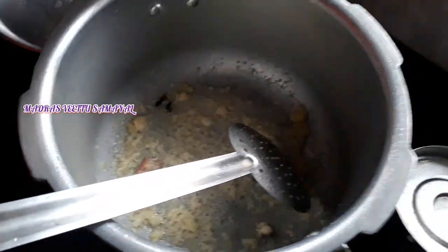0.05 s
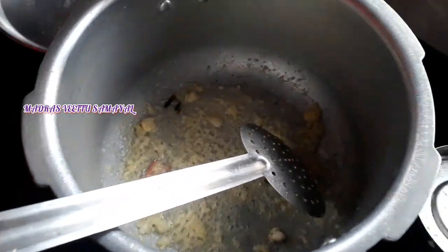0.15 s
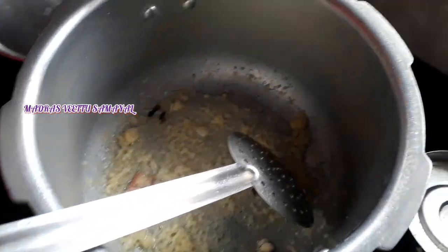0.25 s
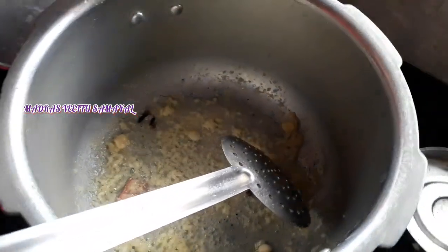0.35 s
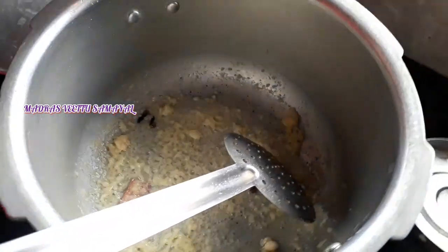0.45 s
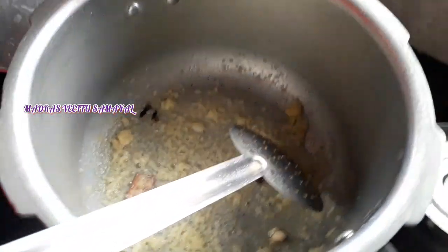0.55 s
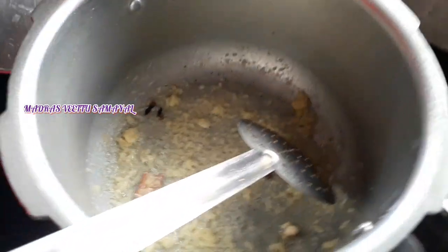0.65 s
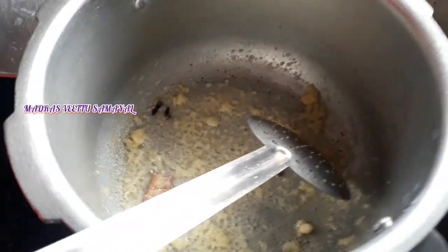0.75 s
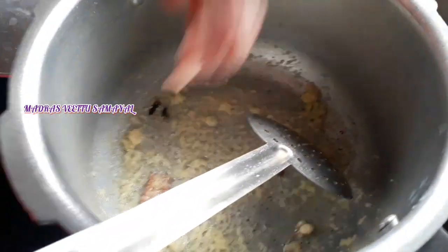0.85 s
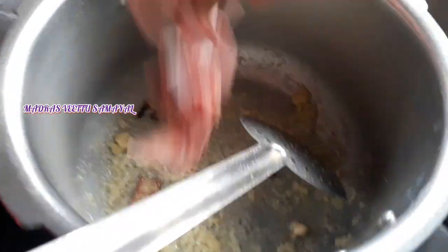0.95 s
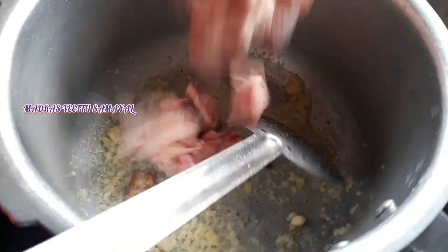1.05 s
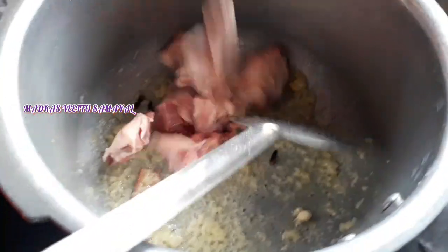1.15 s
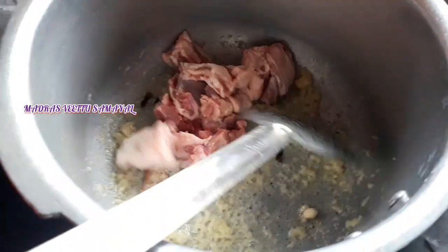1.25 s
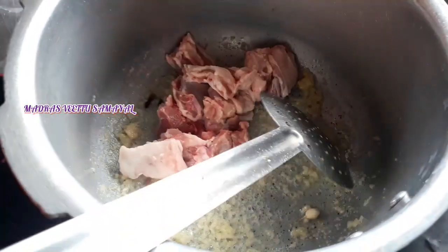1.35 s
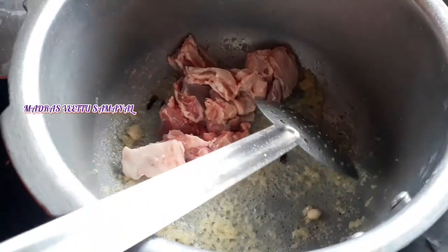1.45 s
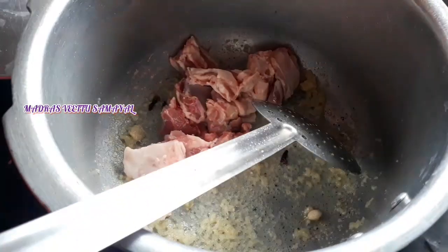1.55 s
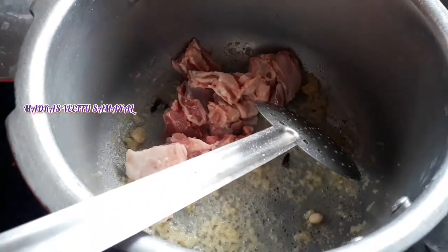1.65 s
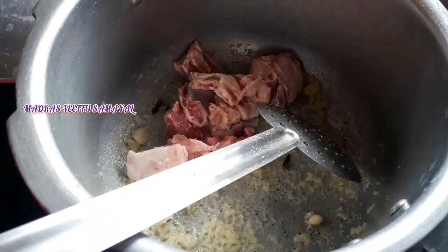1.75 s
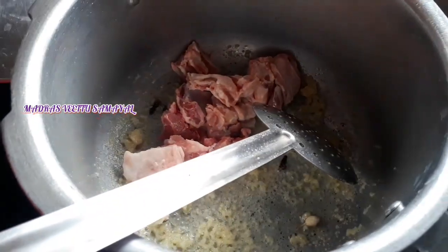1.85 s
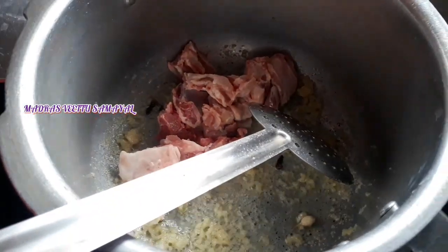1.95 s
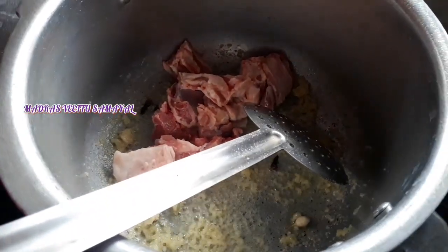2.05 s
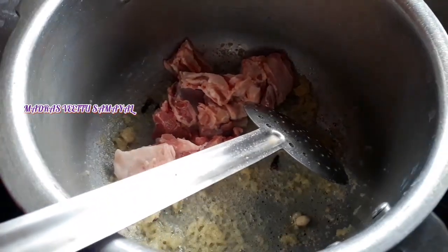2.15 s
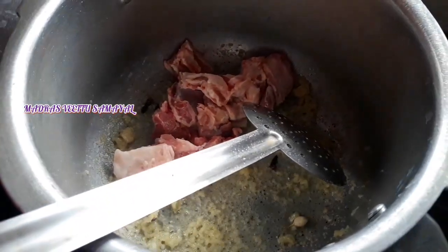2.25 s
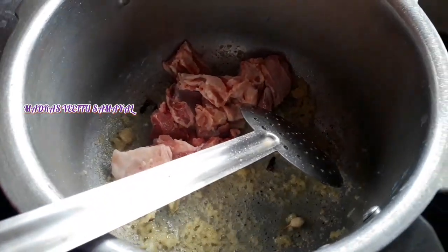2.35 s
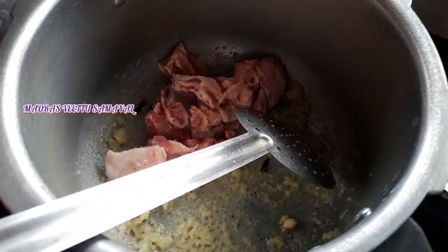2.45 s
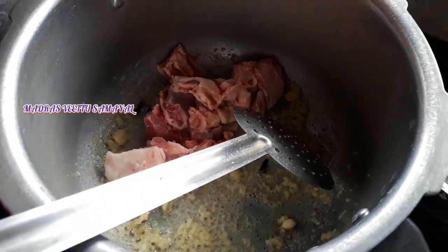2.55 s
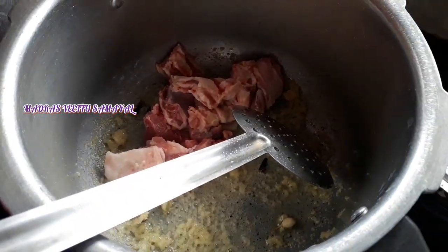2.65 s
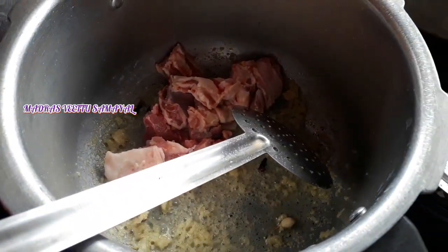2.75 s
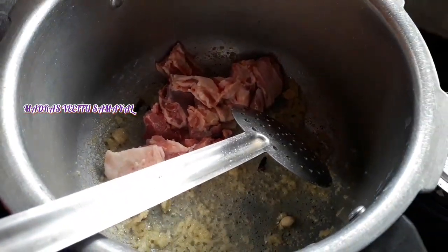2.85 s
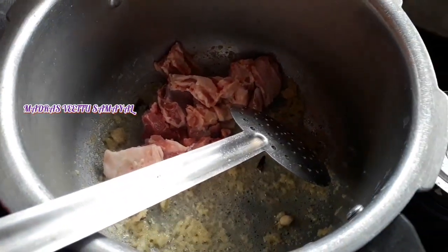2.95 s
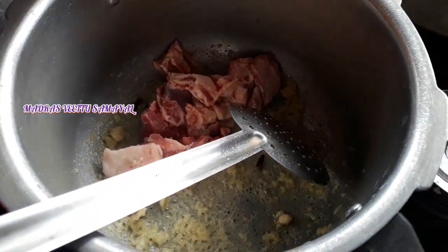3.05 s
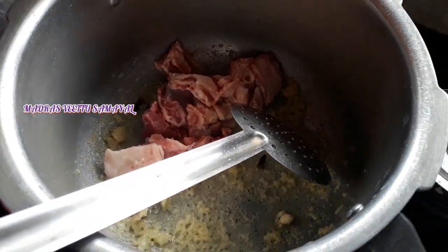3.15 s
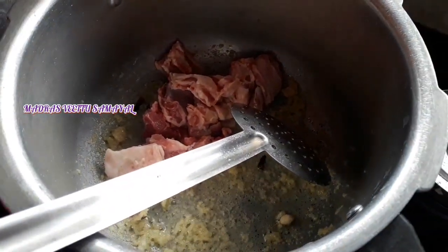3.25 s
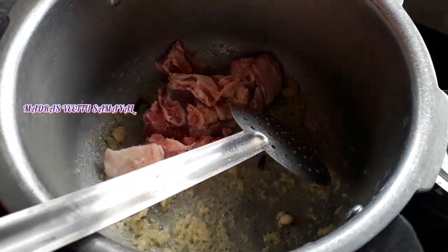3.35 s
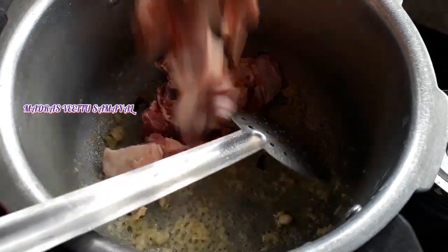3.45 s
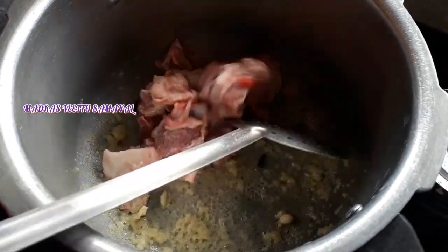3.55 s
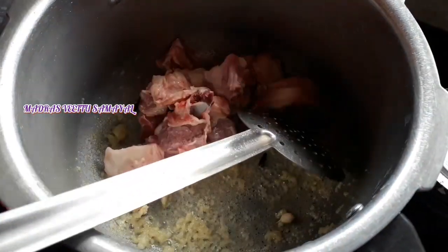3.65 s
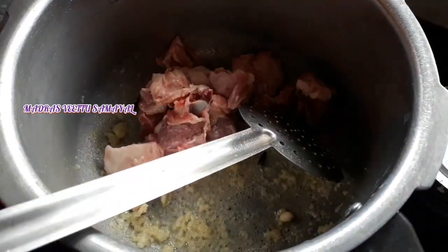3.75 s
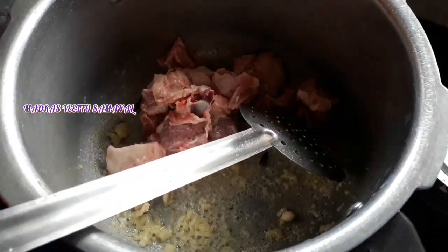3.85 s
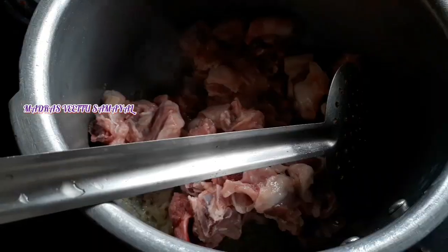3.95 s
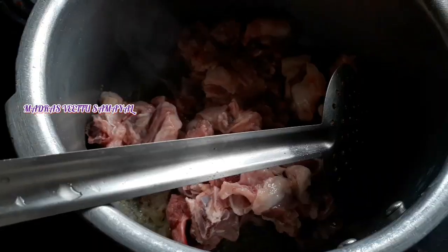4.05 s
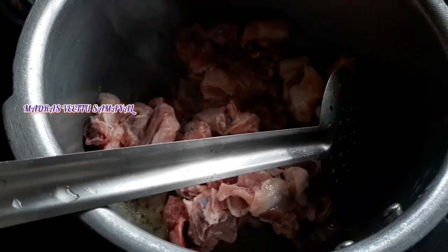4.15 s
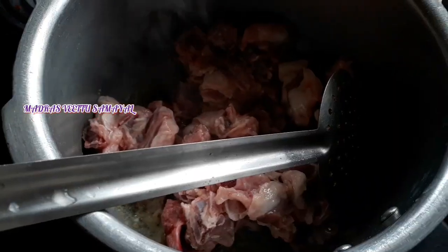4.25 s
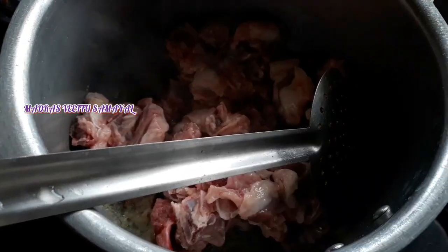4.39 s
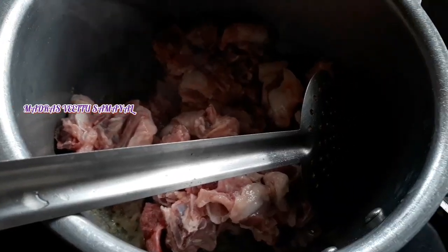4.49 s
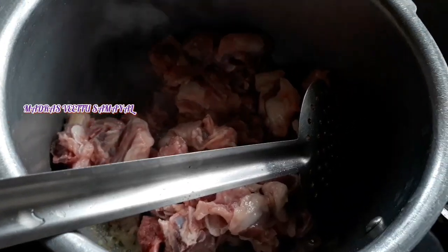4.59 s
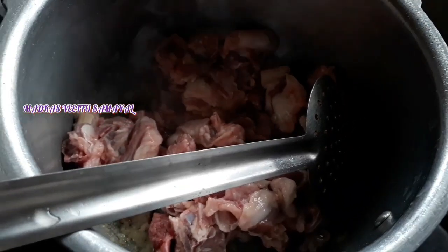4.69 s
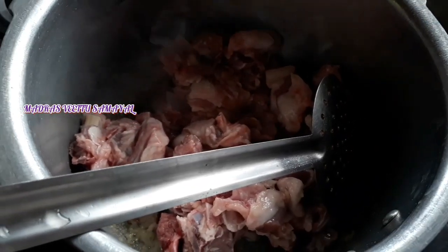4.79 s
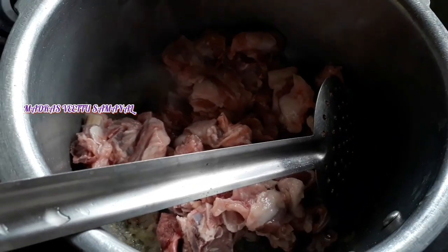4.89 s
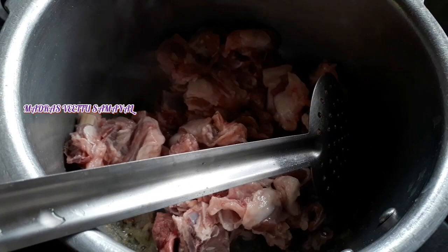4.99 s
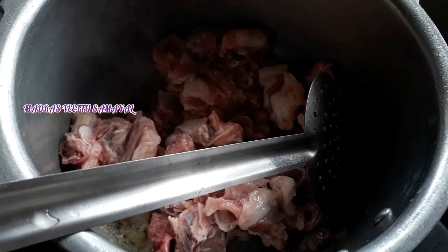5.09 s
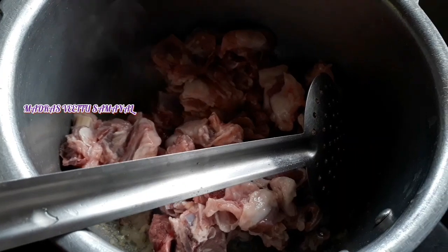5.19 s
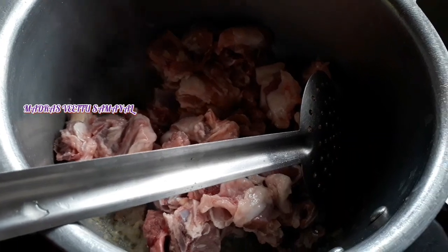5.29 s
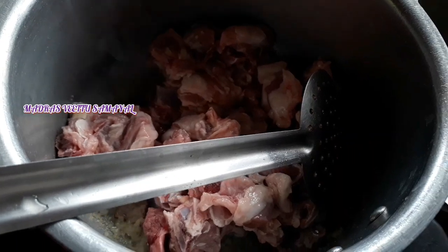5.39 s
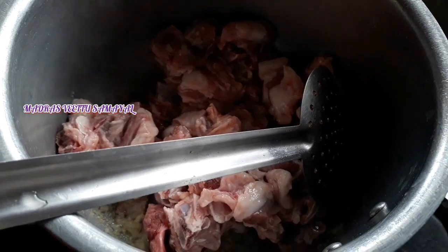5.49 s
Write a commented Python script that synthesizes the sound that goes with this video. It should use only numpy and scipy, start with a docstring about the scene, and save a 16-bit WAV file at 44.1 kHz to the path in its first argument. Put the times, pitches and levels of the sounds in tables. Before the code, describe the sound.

A close stereo phone pickup of frying in an open metal pot. It starts quietly with thin oil fizz, then wet meat drops in, the sizzle leaps up and swells, and a ladle cracks on the rim. Another heavier slap follows, with hissing spits and tiny squeaks. The sizzle becomes lower and wetter, a hollow pot thud sounds, and soft handling bumps come near the end.

```python
"""A small kitchen: two handfuls of raw meat drop into hot oil in an open pressure cooker, close to a phone.
Frying is a crowd of random bubble pops, filtered by the air in the pot; it deepens as the meat covers the bottom.
Slaps, spits and steam squeaks are fading bands of noise; ladle and pot add decaying tones to their noise.
Fingers nudge the phone with single swings of pressure, and the burner rushes softly as low filtered noise."""
import sys
import numpy as np
from scipy import signal
from scipy.fft import rfft, irfft, next_fast_len
from scipy.io import wavfile
from scipy.ndimage import uniform_filter1d

SR = 44100
rng = np.random.default_rng(int(sys.argv[2]) if len(sys.argv) > 2 else 0)


def inscribe(sig):
    """Save sig as 16-bit PCM at rate SR to the path in sys.argv[1].

    A 1-D sig is mono; a 2-D sig holds one channel per row.
    Samples are clipped to [-1, 1] before scaling.
    """
    pcm = np.round(np.clip(np.atleast_2d(sig).T, -1, 1) * 32767)
    wavfile.write(sys.argv[1], SR, pcm.astype(np.int16))


N = 243599
TIME = np.arange(N) / SR  # seconds
SIZE = next_fast_len(N + SR)  # padded length for filtering
FREQ = np.maximum(np.arange(SIZE // 2 + 1) * SR / SIZE, 1)  # Hz

# meat meets the hot metal and starts to boil:
# start_s [s], level_db [dB, before swelling], cooling_db_per_s [dB/s]
LANDINGS = [(0.979, -24.3, 3.5), (1.11, -21, 3), (3.52, -22.5, 1.7)]


def meat():
    """Juice boils off in surges; the heap muffles the spray and the larger bubbles ring the air in the pot."""
    # sound of the frying on open metal: pitch_hz [Hz], level_db [relative dB per Hz]
    open_colour = [(180, -27), (300, -23), (342, -24), (545, -12), (940, -22.5), (1170, -16.5),
                   (1620, -18.5), (1850, -7.5), (2580, -4.5), (3000, -0.5), (5180, 0.5), (6970, -1),
                   (8230, -14), (11700, -1), (15700, -9.5)]
    # sound of the frying under the heap: pitch_hz [Hz], level_db [relative dB per Hz]
    covered_colour = [(180, -66), (300, -18.5), (360, -16), (653, -5.5), (895, -14.5), (1130, -4),
                      (1270, -10.5), (1950, 2), (3100, -1), (3720, 3), (4610, -2), (6860, -3), (8650, -14),
                      (13100, -9.5), (15700, -18)]
    # resonances of the air in the open pot: pitch_hz [Hz], width_hz [Hz], lift_db [dB, negative for a dip]
    pot_air = [(553, 74, 3), (631, 33, 2.5), (1151, 14, 6.5), (1344, 140, 3.5), (1540, 70, 1),
               (1590, 96, 2), (1906, 65, 3), (2094, 180, -2), (2325, 110, 2.5), (2970, 240, 2.5),
               (3500, 170, 1), (4120, 92, 1.5), (4950, 140, 4), (5340, 140, 5)]
    # the second handful settles, then slumps over the hot metal: time_s [s], covered_share [0-1]
    cover_steps = [(3.5, 0.2), (3.6, 0.26), (3.86, 0.43), (3.93, 0.96)]
    cover = np.clip(np.interp(TIME, *np.transpose(cover_steps)), 0, 1)

    # the sizzle starts almost at once; the fine spray builds more slowly
    sizzle_db = boil(rise_s=0.0056)
    spray_db = boil(rise_s=0.098) - 2.5
    # wet bubbling partly follows the sizzle, and grows as juice gathers under the heap
    covered_s = np.cumsum(cover) / SR
    bubbling_db = -31 + 0.22 * (sizzle_db - sizzle_db.max()) + 1.34 * covered_s

    air_db = sum(db / (1 + (2 * (FREQ - hz) / width) ** 2) for hz, width, db in pot_air)
    bursts = echo(pops(per_s=20000, spread_db=2.4), t60=0.12, wet_db=-13)
    fry = colour(bursts * (1 - cover), even(shape(open_colour) + air_db))
    fry += colour(bursts * cover, even(shape(covered_colour) + air_db))

    # large bubbles sound low, the finest spray high; each band surges on its own
    low_pass = signal.butter(3, 2300, fs=SR, output="sos")
    high_pass = signal.butter(3, 8500, "high", fs=SR, output="sos")
    low = signal.sosfiltfilt(low_pass, fry)
    high = signal.sosfiltfilt(high_pass, fry)
    middle = fry - low - high
    # cover strengthens the bubbling and weakens the rest, in dB at full cover
    bubbling = steady(low) * amp(bubbling_db + 5 * cover + surge())
    sizzle = steady(middle) * amp(sizzle_db - 4.5 * cover + surge())
    spray = steady(high) * amp(spray_db - 3 * cover + surge())

    # the frying dips briefly before the second handful
    lull_s, lull_width_s, lull_db = 3.39, 0.061, -1.6
    dip_db = lull_db * np.exp(-((TIME - lull_s) / lull_width_s) ** 2)
    heave_db = 0.35 * walk(7)  # the whole boil heaves slowly
    first_landing_s = LANDINGS[0][0]
    return (bubbling + sizzle + spray) * amp(dip_db + heave_db) * (TIME > first_landing_s)


def boil(rise_s):
    """Strength of the frying in dB: every portion catches, swells and cools, and their powers add."""
    # each portion boils harder as its juice runs out, while the metal cools
    swell_db, swell_s = 10, 0.99
    power = 1e-12  # avoids the logarithm of zero
    for start_s, level_db, cooling_db_per_s in LANDINGS:
        age = np.maximum(TIME - start_s, 0)
        heat_db = swell_db * (1 - np.exp(-age / swell_s)) - cooling_db_per_s * age
        catching = 1 - np.exp(-age / rise_s)
        power = power + amp(level_db + heat_db) ** 2 * catching
    return 10 * np.log10(power)


def surge():
    """Quick, uneven swelling of the boil, in dB."""
    return 0.5 * walk(35)


def oil():
    """Spices fry in the oil: many tiny bubble pops make a thin, fine fizz."""
    # sound of the fizz: pitch_hz [Hz], level_db [relative dB per Hz]
    oil_colour = [(290, -35), (500, -7.5), (840, -19), (1090, -10), (1430, -3), (1750, -4), (1910, -2),
                  (2340, -3.5), (5250, 2.5), (7970, -1.5), (8690, -9), (10600, 0.5), (15700, -1.5)]
    fizz = pops(per_s=16000, spread_db=2.0)
    level_db = -30.5 + 0.18 * walk(25.7)
    return colour(fizz, even(shape(oil_colour))) * amp(level_db)


def slaps():
    """Soft wet pieces hit the bottom and each other, and the hollow of the pot answers in a lower band."""
    # meat landing or shifting: start_s [s], level_db [dB], pitch_hz [Hz, centre]
    slap_times = [(0.97, -30, 650), (0.9858, -19.5, 750), (1.045, -29, 700), (1.15, -26, 1300),
                  (3.532, -11.5, 1200), (3.553, -19.5, 1500), (3.573, -22, 650), (3.694, -26, 800),
                  (4.635, -14.5, 1800), (4.657, -17, 2000), (5.336, -16.5, 1700)]
    out = 0
    for start_s, level_db, pitch_hz in slap_times:
        out = out + flurry(start_s, level_db, t60=0.1, hz=pitch_hz, octaves=0.99)
        out = out + flurry(start_s, level_db - 7.5, t60=0.16, hz=560, octaves=0.19)  # the hollow
    return out


def spits():
    """Drops of water flash to steam in the oil: short bursts of high noise."""
    # bursting drops: start_s [s], level_db [dB], pitch_hz [Hz, centre]
    spit_times = [(.209, -26.5, 5000), (.3357, -27, 8000), (0.989, -13, 6000), (3.538, -14, 4470),
                  (3.607, -13, 5500), (5.334, -7, 3280)]
    return sum(flurry(start_s, db, t60=0.042, hz=hz, octaves=0.93) for start_s, db, hz in spit_times)


def squeaks():
    """Steam squeezed out under a piece squeaks in a narrow band."""
    # escaping steam: start_s [s], level_db [dB], pitch_hz [Hz], t60_s [s, time to fade by 60 dB]
    squeak_times = [(1.1605, -11.5, 5300, .025), (3.477, -14, 5300, .03), (3.538, -11, 4870, 0.091),
                    (3.588, -12, 5260, 0.034), (3.6, -22.5, 2700, .7), (3.701, -23, 2970, 0.77),
                    (4.017, -22.5, 2450, 0.34), (4.165, -21, 2360, .45)]
    return sum(flurry(start_s, db, t60, hz, octaves=0.056) for start_s, db, hz, t60 in squeak_times)


def ladle(start=1.1105):
    """Falling meat tips the ladle against the pot: a hard crack and a quickly damped ring."""
    # sound of the crack: pitch_hz [Hz], level_db [relative dB per Hz]
    clack_colour = [(60, -27), (250, -8), (500, 6.5), (800, -13), (1250, 2.5), (2000, 2.5), (2700, -7),
                    (4200, -8), (9000, -33)]
    # tones of the steel: pitch_hz [Hz], level_db [relative dB], t60_s [s]
    ladle_modes = [(525, -25, 0.15), (1246, -13, 0.11), (1776, -16, 0.12), (2010, 3.5, 0.069),
                   (2100, -4, 0.12), (2200, -14, 0.14), (2490, -16, 0.12), (3170, -15, .12), (3940, -7, .1),
                   (4030, -27, .12)]
    strike = amp(-5.5) * fade(start, 0.012)
    shiver = amp(-12.5) * fade(start, 0.13)
    crack = colour(noise() * (strike + shiver), even(shape(clack_colour)))
    return crack + amp(-7.5) * ring(start, ladle_modes, lag=0.00008)


def knock(rise=0.0015):
    """A dull blow rocks the loaded pot, which booms and drops back on its stand."""
    # blows that rock the pot: start_s [s], level_db [relative dB]
    blows = [(4.632, -12.5), (4.693, -22.5), (4.72, -33)]
    # sound of the scrape: pitch_hz [Hz], level_db [relative dB per Hz]
    knock_colour = [(15, -46), (45, -18), (110, -10), (200, 2), (300, -1.5), (420, -9.5), (600, -0.5),
                    (900, -11), (1500, -13), (4000, -36)]
    # tones of the loaded pot, the broad ones damped at once by the meat:
    # pitch_hz [Hz], level_db [relative dB], t60_s [s]
    pot_modes = [(131, -10, .13), (186.9, -1, 0.69), (214, -12, 0.61), (268, 9, 0.042), (299.6, 1, .4),
                 (310, -10, 0.35), (452, -13, 0.4), (540.5, 0, 0.24), (605, 10, 0.034), (592, -10, 0.41),
                 (675, -8.5, 0.54), (710, -9, 0.21), (762, -6, 0.18), (880, -11, 0.23), (905, -11, 0.28),
                 (1260, -10, 0.41), (1495, 4, .05)]
    out = 0
    for start_s, level_db in blows:
        scrape_level = amp(-1) * fade(start_s, 0.071) + amp(-2.0) * fade(start_s, 0.55)
        scrape = colour(rng.standard_normal(N) * scrape_level, even(shape(knock_colour)))
        boom = scrape + ring(start_s, pot_modes, lag=0.0003)
        onset = np.clip((TIME - start_s) / rise, 0, 1)
        out = out + amp(level_db) * boom * onset
    # the phone picks up little of the deepest bass
    out = signal.sosfilt(signal.butter(1, 130, "high", fs=SR, output="sos"), out)
    left_right_db = 1.5 + 0.45 * np.array([[1], [-1]])
    return out * amp(left_right_db)


def bumps(length=0.0017):
    """Fingers nudge the phone: one soft swing of pressure, felt at the left microphone port."""
    # hand on the phone: start_s [s], level_db [relative dB], left_share [0-1, 1 is left only]
    nudges = [(0.144, -28, 1), (4.254, -27, 1), (5.051, -16, 1), (5.283, -18, 1)]
    out = 0
    for start_s, level_db, left_share in nudges:
        age = (TIME - start_s) / length - 1
        swing = 2 * age * np.exp(-age ** 2)
        out = out + amp(level_db) * np.array([[left_share], [1 - left_share]]) * swing
    # slow pressure leaks past the diaphragm
    return signal.sosfilt(signal.butter(1, 70, "high", fs=SR, output="sos"), out)


def stove():
    """The burner in the kitchen: low filtered noise whose level wavers a little."""
    # sound of the burner: pitch_hz [Hz], level_db [relative dB per Hz]
    stove_colour = [(25, -58), (45, -26), (85, -2.5), (130, -6.5), (195, 3.5), (250, -9), (295, 3),
                    (335, -5), (450, -1.5), (700, -6.5), (1100, -12.5), (2500, -45)]
    level_db = -40.5 + 1.76 * walk(5.12)
    return colour(noise(), even(shape(stove_colour))) * amp(level_db)


def ports(x):
    """Long waves reach both ports alike; the phone's body shades them unequally, more or less as it moves."""
    # difference between the ports: pitch_hz [Hz], side_minus_mid_db [dB added to the side]
    width = [(60, -14), (250, -18.5), (550, -21), (900, -5.5), (1250, -0.5), (2400, -4.5), (3600, 1),
             (4200, 3.5), (5200, 0), (15000, 0)]
    # balance of the ports, scaled by the depth of shading: pitch_hz [Hz], left_minus_right_db [dB at depth 1]
    tilt = [(500, 0), (1700, 0.4), (2800, -2), (4000, -2.5), (5200, -.5), (6000, 4.5), (8600, 10),
            (10500, 3), (13000, 3), (15500, -3)]
    mid, side = (x[0] + x[1]) / 2, (x[0] - x[1]) / 2
    side = irfft(rfft(side, SIZE) * amp(shape(width)), SIZE)[:N]
    pair = rfft(np.array([mid + side, mid - side]), SIZE)

    def shaded(depth):
        """Tilt the balance of the ports at each pitch, keeping the mean power gain at 1."""
        gains = amp(depth * shape(tilt) * np.array([[1], [-1]]) / 2)
        gains = gains / np.sqrt(np.mean(gains ** 2, axis=0))
        return irfft(pair * gains, SIZE)[:, :N]

    turn = np.interp(TIME, [0.95, 1.05, 3.8, 3.93], [1, 0, 0, 1])
    return shaded(depth=0.92) * (1 - turn) + shaded(depth=1.47) * turn


def echo(x, t60, wet_db):
    """Add a dense tail of reflections, different at each port."""
    tail = (noise() * fade(0.00075, t60))[:, :SR // 2]
    tail /= np.sqrt(np.sum(tail ** 2, axis=1, keepdims=True))
    return x + amp(wet_db) * signal.fftconvolve(x, tail, axes=1)[:, :N]


def pops(per_s, spread_db):
    """Bursting bubbles, mostly small and a few large; each reaches the two ports with its own lag."""
    size = amp(spread_db * np.minimum(rng.exponential(size=N), 6.5))
    bursting = rng.random(N) < per_s / SR
    size *= rng.choice([-1, 1], N) * bursting
    arrival = (np.arange(N) + rng.integers(-14, 15, N)) % N
    return unit(np.array([size, np.bincount(arrival, size, N)]))


def flurry(start, db, t60, hz, octaves):
    """A brief, fading rush of noise in one band."""
    band_db = -10 * np.log10(1 + (np.log2(FREQ / hz) / octaves) ** 4)
    rush = rfft(noise() * fade(start, t60), SIZE)
    return irfft(rush * amp(db + even(band_db)), SIZE)[:, :N]


def ring(start, modes, lag):
    """Decaying tones after a blow; the right port hears them lag seconds later."""
    age = TIME[:SR] - np.array([[0], [lag]])
    tone = 0
    for hz, db, t60 in modes:
        decay = np.exp(-np.log(1000) * age / t60)
        tone = tone + amp(db) * np.sin(2 * np.pi * hz * age) * decay
    return np.pad(tone * (age > 0), ((0, 0), (int(start * SR), N)))[:, :N]


def steady(x):
    """Hold the slow level at rms 1 and keep the quick crackle."""
    return x / np.sqrt(uniform_filter1d(np.mean(x ** 2, axis=0), size=SR // 4))


def walk(rate):
    """Slow random wavering with rms 1, taking about rate new values per second."""
    hold = int(SR / rate)
    steps = np.repeat(rng.standard_normal(N // hold + 1), hold)
    return unit(uniform_filter1d(steps, hold)[:N])


def fade(start, t60):
    """Exponential decay from a moment on, falling 60 dB in t60 seconds."""
    return (TIME >= start) * np.exp(-np.log(1000) * np.maximum(TIME - start, 0) / t60)


def noise():
    """Unrelated white noise at the two ports."""
    return rng.standard_normal((2, N))


def colour(x, db):
    """Filter with the given dB on every frequency, never sounding ahead of its input."""
    # folding the cepstrum gives the filter its minimum phase
    cepstrum = irfft(np.log(amp(db)), SIZE)
    cepstrum[1:SIZE // 2] *= 2
    cepstrum[SIZE // 2 + 1:] = 0
    return irfft(rfft(x, SIZE) * np.exp(rfft(cepstrum)), SIZE)[..., :N]


def shape(points):
    """Turn (Hz, dB) points into dB on every frequency."""
    hz, db = np.transpose(points)
    return np.interp(np.log(FREQ), np.log(hz), db)


def even(db):
    """Shift a filter so that white noise keeps its power."""
    return db - 10 * np.log10(np.mean(amp(db) ** 2))


def amp(db):
    """Decibels to gain."""
    return 10 ** (np.asarray(db) / 20)


def unit(x):
    """Scale to rms 1."""
    return x / np.sqrt(np.mean(x ** 2))


def scene():
    """Everything in the pot, with a little kitchen around it; knock and bumps skip the shading at the ports."""
    hits = echo(slaps() + spits() + squeaks() + ladle(), t60=0.57, wet_db=-6.5)
    through_air = ports(meat() + oil() + hits + stove())
    return through_air + knock() + bumps()


def record(dry):
    """Round off the loudest peaks smoothly and cut the top."""
    top_hz = 15850
    rounded = dry / (1 + dry ** 8) ** (1 / 8)
    low_pass = signal.ellip(10, 0.05, 50, top_hz, fs=SR, output="sos")
    return signal.sosfiltfilt(low_pass, rounded)


dry = scene()
out = record(dry)
inscribe(out)
```